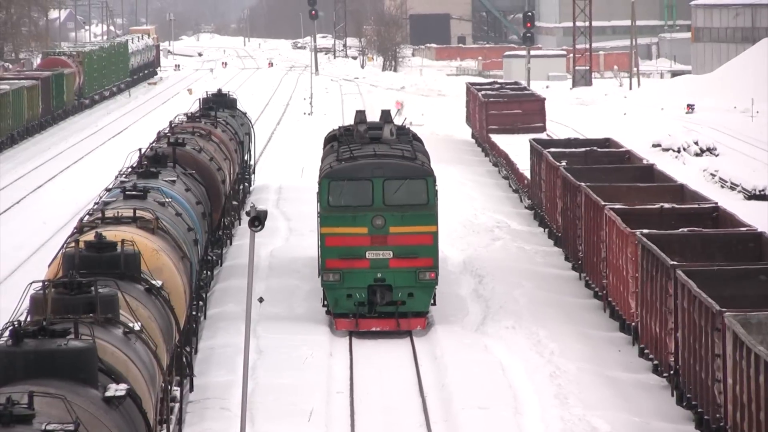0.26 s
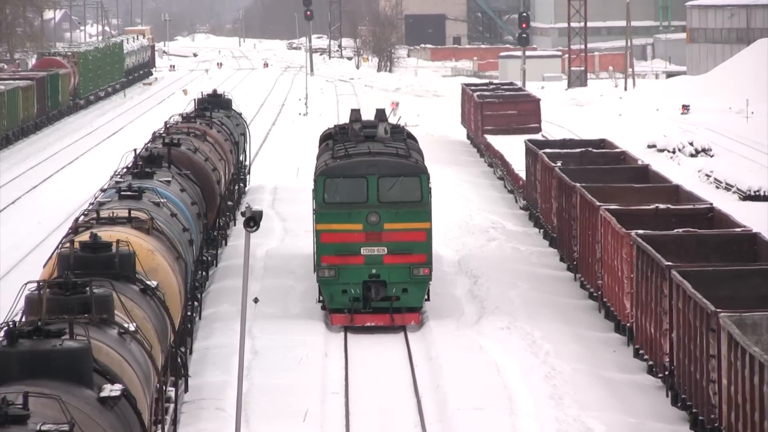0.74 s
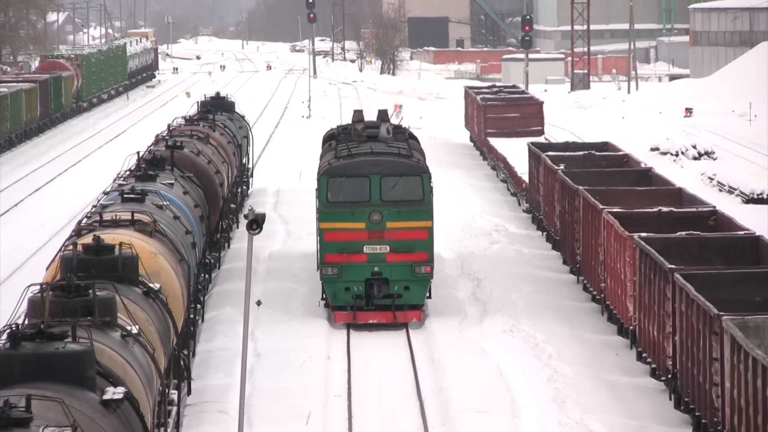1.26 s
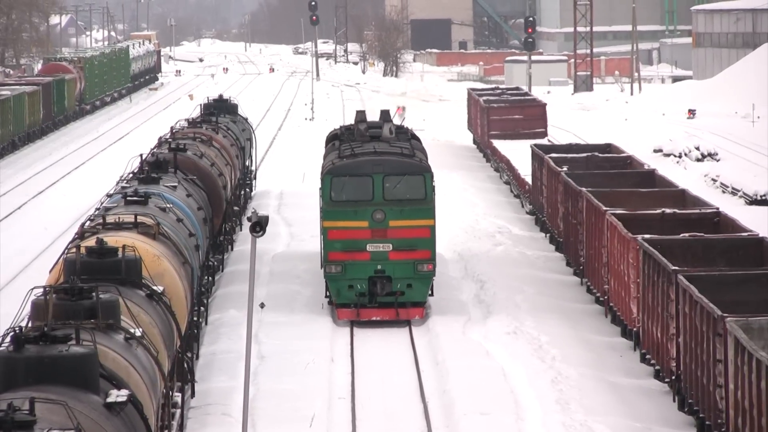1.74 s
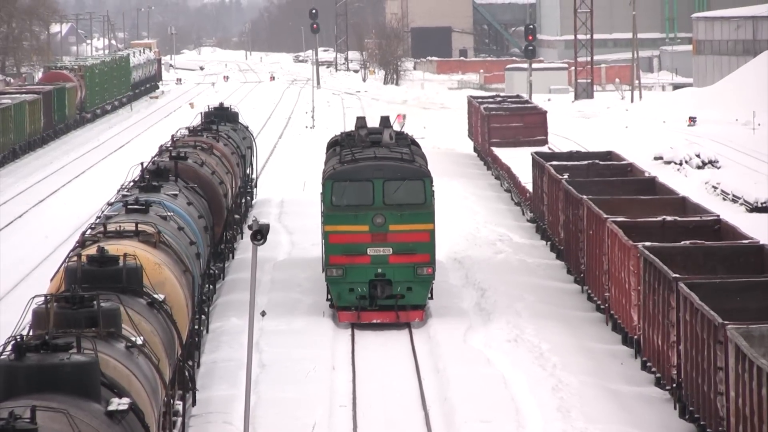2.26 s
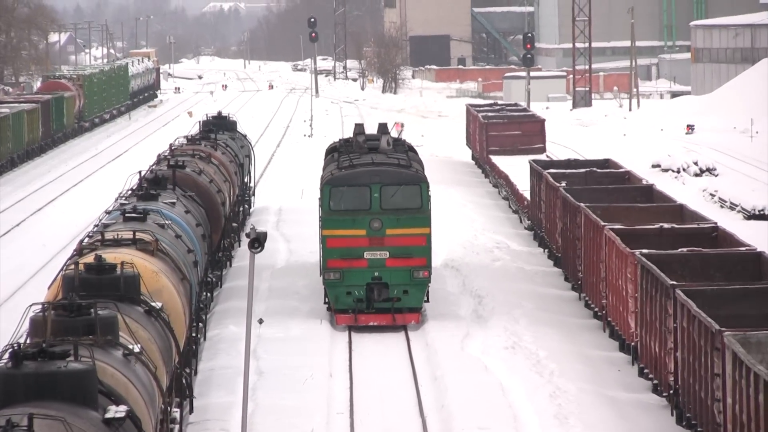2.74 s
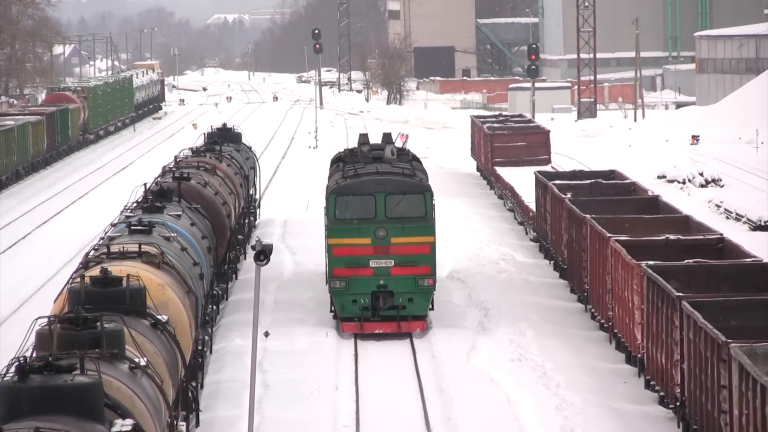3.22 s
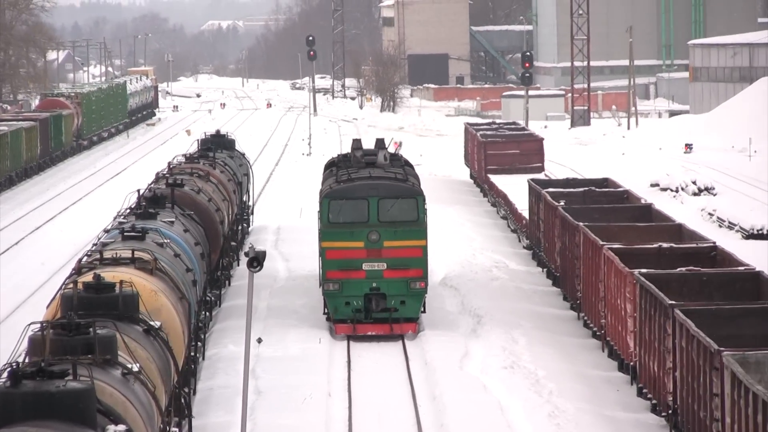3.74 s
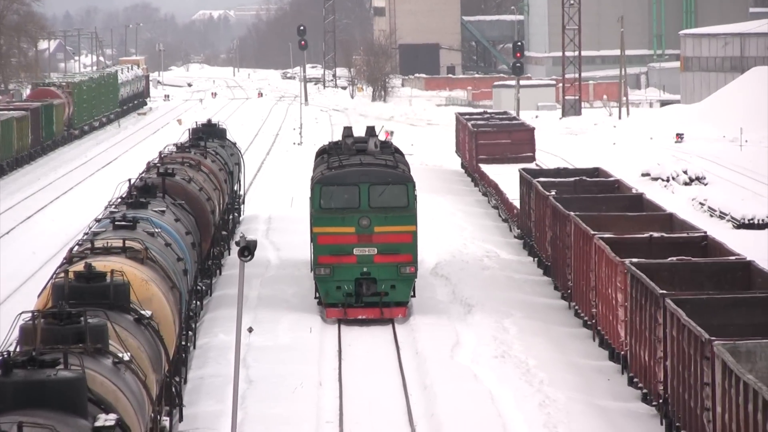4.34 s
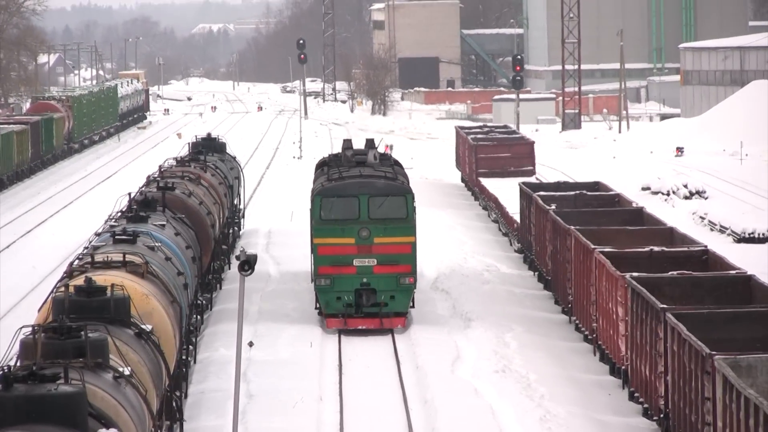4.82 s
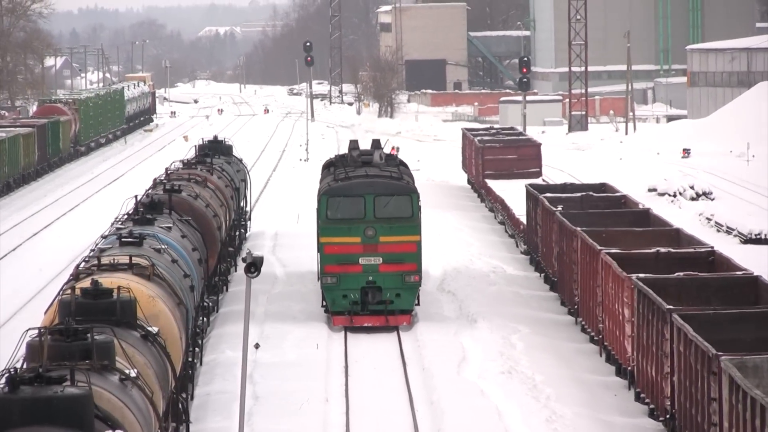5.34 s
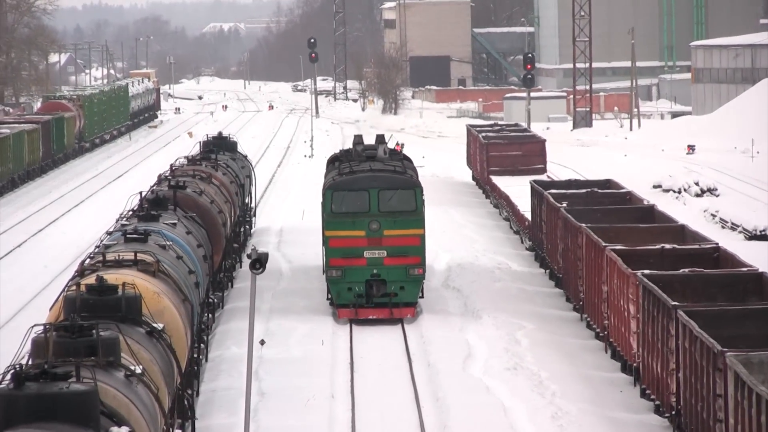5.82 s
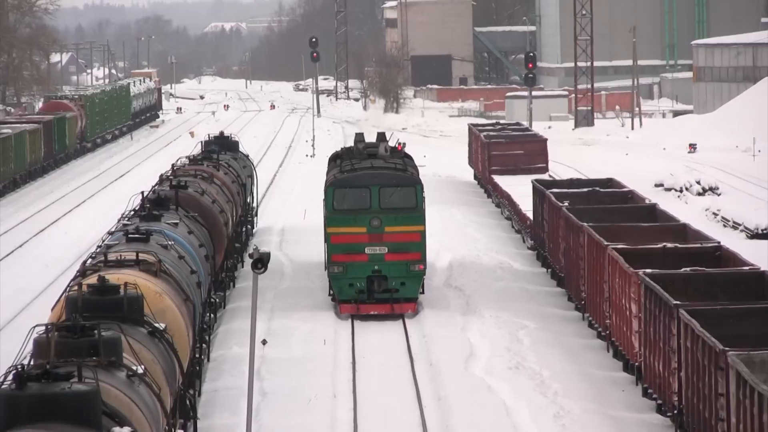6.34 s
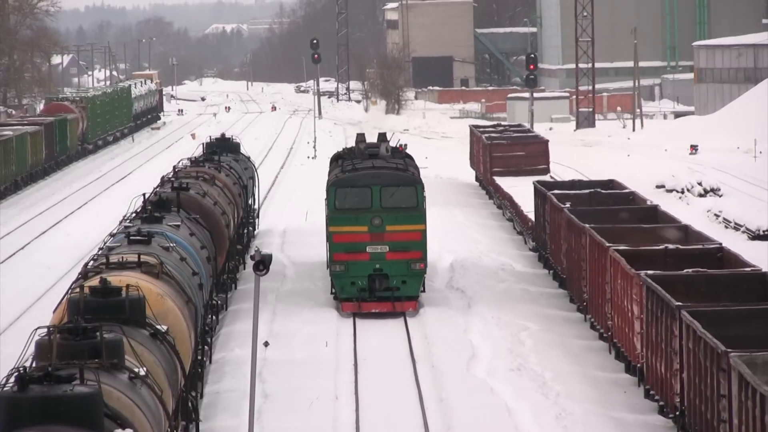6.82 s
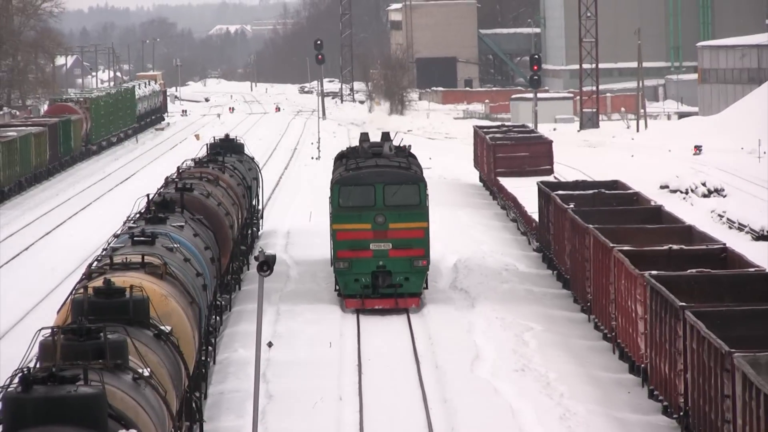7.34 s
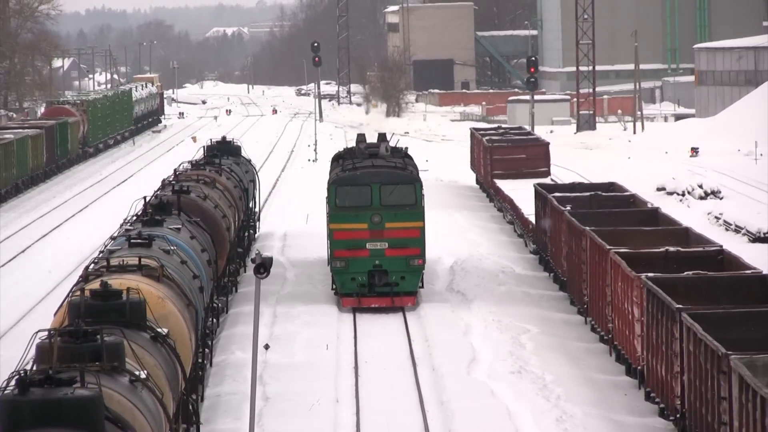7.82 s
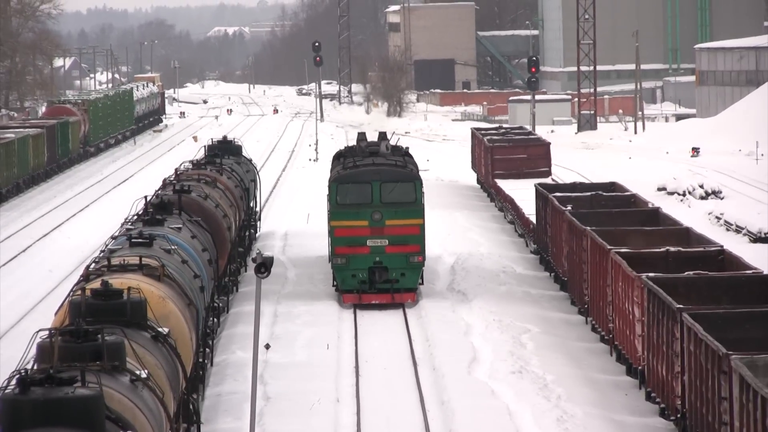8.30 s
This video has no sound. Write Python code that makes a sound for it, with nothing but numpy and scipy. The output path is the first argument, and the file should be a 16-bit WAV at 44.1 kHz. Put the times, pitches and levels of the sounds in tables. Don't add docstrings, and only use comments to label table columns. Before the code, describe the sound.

A slow, heavy diesel throb dominates, low and lumpy, loudest at the start and receding as the locomotive rolls away. Beneath it sit a rumbling block, regular dull clacks, a weak fluttering blower whine and a broad yard roar. Faint wind pressure, high hiss and steady camera whine lie underneath. From about two seconds onward, handling ticks, knocks, small rubs and one tiny squeak sound very near the stereo microphone.

```python
import sys
import numpy as np
from scipy import signal
from scipy.fft import irfft
from scipy.io import wavfile
from scipy.ndimage import uniform_filter1d, map_coordinates

SR = 44100
rng = np.random.default_rng(int(sys.argv[2]) if len(sys.argv) > 2 else 0)


def attenuation_scalar(level_db):
    decades = np.asarray(level_db, float) / 20
    return 10 ** decades


def store_pcm(level_fs):
    pcm = np.round(np.clip(level_fs, -1, 1) * 32767).astype(np.int16)
    wavfile.write(sys.argv[1], SR, np.atleast_2d(pcm).T)


N = 377937


def evened(x):
    return x / np.sqrt(np.mean(x ** 2) + 1e-20)


def read(points, hz):
    point_hz, value = np.transpose(points)
    return np.interp(np.log(hz + 1), np.log(point_hz + 1), value)


def coloured(x, points):
    half = read(points, np.fft.rfftfreq(32768, 1 / SR)) * np.log(10) / 20
    full = np.r_[half, half[-2:0:-1]]
    response = np.exp(full - 1j * signal.hilbert(full).imag)
    taps = np.fft.ifft(response).real[:9600]
    return signal.oaconvolve(x, taps)[:N]


def drift(rate_hz):
    knots = rng.standard_normal(200)
    coarse = np.arange(0, N + 256, 256)
    wander = map_coordinates(knots, [coarse / SR * rate_hz], order=3)
    return np.interp(np.arange(N), coarse, evened(wander))


def noise(points, patchy_db):
    frames, hz = N // 512 + 5, np.fft.rfftfreq(2048, 1 / SR)
    a, b, c, d, patches = rng.standard_normal((frames, 1025, 5)).T
    patches = uniform_filter1d(patches, 14, 0)
    patches = evened(uniform_filter1d(patches, 12, 1))
    inside = (hz >= points[0][0]) & (hz <= points[-1][0])
    shape = attenuation_scalar(read(points, hz)[:, None] + patchy_db * patches) * inside[:, None]
    return hz, shape * (a + 1j * b), shape * (c + 1j * d)


def heard(z):
    return evened(signal.istft(np.array(z), nperseg=2048, noverlap=1536)[1][..., :N])


def tones(hz, db):
    bins = np.zeros(N // 2 + 1, complex)
    bins[np.round(hz * N / SR).astype(int)] = attenuation_scalar(db) * np.exp(2j * np.pi * rng.random(len(hz)))
    return irfft(bins, N) * N / np.sqrt(2)


def add(mix, s, sound):
    part = mix[:, round(s * SR):][:, :sound.shape[1]]
    part += sound[:, :part.shape[1]]


def fade_db():
    fall_db, time_s = -6.5, 3.2
    return fall_db * (1 - np.exp(-np.arange(N) / SR / time_s))


def crank():
    # (time [s], speed [rpm])
    speed = [(0.0, 292.61), (0.4, 299.38), (0.8, 306.09), (1.2, 311.17), (1.6, 313.77), (2.1, 313.11),
             (2.7, 310.46), (3.4, 307.53), (4.2, 304.11), (5.0, 301.94), (6.0, 300.34), (7.0, 298.91),
             (8.0, 297.9), (8.6, 297.24)]
    s, rpm = np.transpose(speed)
    rpm_now = np.interp(np.arange(N) / SR, s, rpm)
    start_cycle = .06155
    return start_cycle + np.cumsum(rpm_now / 120) / SR


def rumble():
    # (frequency [Hz], level [dB per Hz])
    wind = [(12, -7), (25, -4.5), (40, 10.5), (60, 8.5), (90, -15)]
    hz, a, b = noise(wind, patchy_db=6.0)
    return heard([a + .2 * b, .85 * a - .2 * b]) * attenuation_scalar(-51.5 + 1.2 * drift(4.1))


def roar():
    # (frequency [Hz], level [dB per Hz])
    machinery = [(150, -36.5), (230, -5.5), (340, -10.5), (420, -6.5), (560, -12.5), (710, -11.5),
                 (950, -16), (1150, -18), (1480, -15.5), (1650, -23.5), (1800, -24.5), (2600, -33.5),
                 (3400, -43.5), (5200, -61.5)]
    # (frequency [Hz], likeness [-1 to 1])
    likeness = [(60, 0.99), (120, 0.74), (230, 0.91), (460, 0.95), (900, 0.89), (1780, 0.82), (3510, 0.52),
                (6930, -0.44), (13600, -0.62)]
    # (frequency [Hz], left over right [dB])
    balance = [(60, -2.5), (180, 4.5), (530, 0.5), (1560, 1.0), (4610, -1.5), (13600, 2.5)]
    hz, a, b = noise(machinery, patchy_db=1.7)
    same = np.clip(read(likeness, hz), -1, 1)[:, None]
    lean = attenuation_scalar(read(balance, hz) / 2)[:, None]
    left = a * lean
    right = (same * a + np.sqrt(1 - same ** 2) * b) / lean
    return heard([left, right]) * attenuation_scalar(-35.5 - 0.12 * fade_db())


def camera_hiss():
    # (frequency [Hz], level [dB per Hz])
    common = [(2000, 1), (3000, -6), (4000, -13.5), (5000, -12), (6200, -5), (7500, -5), (9300, -3.5),
              (10000, -8.5), (11500, -11.5), (12300, -21.5), (13450, -18), (13700, -40.5)]
    # (frequency [Hz], level [dB per Hz])
    opposed = [(2000, -18), (3000, -6), (5000, -4), (8000, -13.5), (8900, -5), (9300, -1), (9600, -17),
               (11000, -18.5), (12000, -19), (12400, -25.5), (13450, -22.5), (13700, -37.5)]
    mid = heard(noise(common, patchy_db=-1.5)[1]) * attenuation_scalar(-68)
    side = heard(noise(opposed, patchy_db=2.5)[2]) * attenuation_scalar(-61)
    return np.array([mid + side, mid - side])


def camera_motor():
    # (frequency [Hz], level [dB rms])
    cluster = [(4026, -71), (4049.8, -68), (4073, -71), (4091, -73), (4200, -74.5), (4474, -77),
               (4499.6, -73)]
    # (frequency [Hz], level [dB rms])
    whine = [(5173, -85), (5259, -82), (5819, -83), (5846, -87), (6164, -80), (6202, -79), (5400, -79),
             (7200, -80), (6401, -80), (8001, -80), (8452, -79), (8646, -86)]
    # (frequency [Hz], level [dB])
    shell = [(4500, -79.5), (8200, -117), (9300, -74), (9800, -82), (11500, -89.5), (12300, -86)]
    # (frequency [Hz], level [dB])
    shell_mid = [(3600, -81.5), (6200, -88.5), (7500, -93), (9400, -84.5), (10500, -86), (12000, -95.5),
                 (12500, -102), (13500, -92)]
    drum_hz, drum_db = 300, -82.5
    drum = [(k * drum_hz, drum_db) for k in (16, 17, 19, 20, 21, 22, 23, 25, 26, 27, 28)]

    t = np.arange(N) / SR
    out = np.zeros((2, N))
    for hz, db in [*cluster, *whine, *drum]:
        phase = rng.random()
        lag = np.clip(hz - 4100, 0, None) / 1900
        level = attenuation_scalar(db + 3 + 1.8 * drift(2.2))
        out += level * np.sin(2 * np.pi * (hz * t + phase) + np.array([[0], [lag]]))

    stray_count = 110
    comb = np.r_[np.arange(4500, 12100, 300), 9127, 9296, 9352, 9449, 9577, 9659]
    hz = np.r_[comb, rng.uniform(8300, 12300, stray_count)]
    lift_db = np.r_[np.full(len(comb), 5.0), 3.0 * rng.standard_normal(stray_count)]
    side = tones(hz, read(shell, hz) + lift_db)
    hz = np.r_[np.arange(3600, 13500, 150), rng.uniform(3600, 13500, stray_count)]
    mid = tones(hz, read(shell_mid, hz) + 2.8 * rng.standard_normal(len(hz)))
    return out + mid + side * np.array([[.85], [-1.1]])


def ticks():
    # (time [s], peak [dB], part above 9 kHz [dB], left over right [dB])
    sharp_ticks = [(2.8325, -30.5, -55, -0.5), (3.3565, -34, -50, -1.5), (3.6, -44, -69.5, -2.5),
                   (3.916, -50.5, -55, -2.5), (4.114, -38, -55, 3.5), (4.448, -54, -50.5, -0.5),
                   (4.678, -44, -65.5, -4), (5.114, -42.5, -69, -7.5), (5.4146, -62, -54.5, -1),
                   (5.6753, -43, -70, -7), (6.3947, -43, -59, 4), (6.4385, -46, -64, 0),
                   (7.5322, -46.5, -58, 1), (8.337, -33.5, -57.5, -3.5), (8.569, -31.5, -41.5, 3)]
    out, t = np.zeros((2, N)), np.arange(9000) / SR
    body = signal.butter(2, [3000, 9000], "band", fs=SR)
    top = signal.butter(2, [8500, 13500], "band", fs=SR)
    for s, db, top_db, pan_db in sharp_ticks:
        burst = rng.standard_normal(9000) + 0.96 * rng.standard_normal((2, 9000))
        burst *= attenuation_scalar(-60 * t / .009) + attenuation_scalar(-25 - 60 * t / .05)
        tick = attenuation_scalar(db - 1.0) * signal.lfilter(*body, burst)
        tick += attenuation_scalar(top_db + 7.0) * signal.lfilter(*top, burst)
        add(out, s, tick * attenuation_scalar(np.array([[pan_db], [-pan_db]]) / 2))
    return out


def knocks():
    # (time [s], peak [dB], centre [Hz], reach [octaves])
    blows = [(1.776, -43, 3100, .1), (1.791, -30.5, 1850, 0.43), (1.848, -40, 2930, .1),
             (1.92, -46, 3600, .08), (2.835, -24.5, 1030, .15), (2.833, -33.5, 2150, 1),
             (3.357, -36, 3750, .08), (6.412, -44, 4440, .08), (7.408, -27, 1880, 0.25),
             (7.41, -39, 3350, 0.11), (7.857, -41, 2500, .5), (7.886, -36, 2250, .06),
             (7.995, -39, 2400, .3), (8.337, -32.5, 3750, .1)]
    # (frequency [Hz], time to fall 60 dB [s])
    case = [(1030, 0.063), (1410, 0.06), (1645, 0.08), (1930, 0.033), (2270, 0.041), (2830, 0.035),
            (3100, 0.032), (3500, 0.018), (3700, 0.016), (4100, .03), (4440, 0.038)]
    out, t = np.zeros((2, N)), np.arange(9000) / SR
    mode_hz, t60 = np.transpose(case)[:, :, None]
    for s, db, hz, reach in blows:
        spread = mode_hz * rng.uniform(.96, 1.04, (3, len(case), 1))
        near_db = -6 * (np.log2(mode_hz / hz) / reach) ** 2
        modes = np.sin(2 * np.pi * spread * t).mean(0) * attenuation_scalar(db + near_db - 60 * t / t60)
        ring = modes.sum(0) * np.minimum(t / 0.0012, 1)
        add(out, s, np.array([ring, .95 * ring]))
    return out


def scrapes():
    # (start [s], end [s], low edge [Hz], high edge [Hz], level [dB])
    rubs = [
        (1.774, 1.95, 1500, 3500, -56),
        (3.356, 3.451, 5000, 9800, -63.5),
        (4.66, 4.811, 2000, 6000, -67),
        (7.413, 7.453, 1500, 3500, -55),
        (7.841, 8.035, 1900, 3300, -56.5),
    ]
    out = np.zeros((2, N))
    for start, end, low_hz, high_hz, db in rubs:
        grip = evened(uniform_filter1d(rng.standard_normal(9000), 300))
        grains = rng.standard_normal((2, 9000)) * attenuation_scalar(3.5 * grip)
        band = signal.butter(3, [low_hz, high_hz], "band", fs=SR)
        rub = evened(signal.lfilter(*band, grains + grains[::-1] * .6))
        rub = rub[:, :round((end - start) * SR)]
        add(out, start, attenuation_scalar(db) * rub * signal.windows.tukey(rub.shape[1], .3))
    return out


def squeak():
    start_s, length_s, hz, db = 7.035, .07, 2820, -54
    out, t = np.zeros((2, N)), np.arange(9000) / SR
    swell = np.sin(np.pi * np.minimum(t / length_s, 1))
    add(out, start_s, attenuation_scalar(db) * swell * np.sin(2 * np.pi * hz * t) * np.ones((2, 1)))
    return out


def blower():
    # (frequency [Hz], level [dB rms])
    whine = [(1482, -58.5), (1497, -56), (1635, -61.5)]
    t, out = np.arange(N) / SR, np.zeros(N)
    for hz, db in whine:
        flutter = attenuation_scalar(2.5 * drift(11))
        wobble = np.cumsum(drift(6)) / SR * 1.3
        out += attenuation_scalar(db + 5) * flutter * np.sin(2 * np.pi * (hz * t + wobble))
    return out


def block():
    # (frequency [Hz], level [dB per Hz])
    iron = [(40, -81), (60, -8.5), (85, 2), (120, -4), (155, 6), (200, 0.5), (270, -2.5), (330, -13.5),
            (450, -12.5), (560, -18.5), (700, -20.5), (900, -41)]
    change = .3
    fresh = rng.standard_normal((24, 4096))
    kept = np.sqrt(1 - change ** 2)
    pattern = signal.lfilter([1], [1, -kept], np.r_[fresh[:1], change * fresh[1:]], axis=0)
    cycles = crank()
    shaking = np.interp(cycles * 4096, np.arange(pattern.size), pattern.ravel())
    swing_db = 2.5 * np.cos(2 * np.pi * (cycles - .18))
    return evened(coloured(shaking, iron)) * attenuation_scalar(-26 + 0.65 * fade_db() + swing_db)


def valve_gear():
    angle_deg, hz, t60_s, db = 146, 705, .09, -30
    at = np.flatnonzero(np.diff(np.floor(2 * crank() - angle_deg / 360)))
    train, t = np.zeros(N), np.arange(6000) / SR
    train[at] = attenuation_scalar(2.5 * rng.standard_normal(60)[:len(at)])
    ring = np.sin(2 * np.pi * hz * t) * attenuation_scalar(-60 * t / t60_s) * np.minimum(t / .008, 1)
    return signal.oaconvolve(train, ring)[:N] * attenuation_scalar(db + 0.28 * fade_db())


def exhaust():
    # (crank angle [deg], first turn near [dB], first turn far [dB],
    #         second turn near [dB], second turn far [dB])
    firings = [(10.4, -2.0, -4.0, -3.0, -3.0), (44.4, -30.0, -10.0, -18.0, -23.0),
               (84.0, -13.0, -9.0, -11.0, -8.0), (102.5, -5.0, -30.0, -7.0, -6.0),
               (117.5, -4.0, 0.0, -5.0, -8.0), (147.5, -5.0, -3.0, -5.0, -10.0),
               (170.0, -5.0, -2.0, -4.0, -3.0), (207.5, -6.0, -3.0, -2.0, -14.0),
               (238.5, -26.0, -8.0, -13.0, -30.0), (267.5, -13.0, -7.0, -20.0, -6.0),
               (308.0, -15.0, -10.0, -5.0, -5.0), (314.5, -14.0, -17.0, -0.0, 0.0),
               (336.5, -13.0, -19.0, -8.0, -6.0), (346.5, -8.0, -13.0, -10.0, -13.0)]
    # (frequency [Hz], level [dB])
    stack = [(20.0, -36.0), (50.0, -66.2), (80.0, -12.6), (105.0, -14.8), (125.0, -5.3), (155.0, -0.4),
             (180.0, -10.2), (200.0, -19.3), (290.0, -46.7), (400.0, -57.4), (1000.0, -36.0)]
    recede_s, uneven_db = 3, 0.27
    cycles, train = crank(), np.zeros(N)
    for angle, *strength_db in firings:
        for turn, (near, far) in enumerate(attenuation_scalar(np.reshape(strength_db, (2, 2)))):
            at = np.flatnonzero(np.diff(np.floor(cycles - angle / 720 - turn / 2)))
            strength = far + (near - far) * np.exp(-at / SR / recede_s)
            train[at] -= strength * attenuation_scalar(uneven_db * rng.standard_normal(30)[:len(at)])
    silencer = signal.butter(4, [45, 330], "band", fs=SR, output="sos")
    boom = signal.sosfiltfilt(silencer, coloured(train, stack))
    slow = np.sqrt(uniform_filter1d(boom ** 2, SR))
    return boom / slow * attenuation_scalar(-15.5 + fade_db())


def scene():
    engine = exhaust() + block() + valve_gear() + blower()
    engine = engine * attenuation_scalar(np.array([[.9], [-1.0]]))
    handling = ticks() + knocks() + scrapes() + squeak()
    return engine + roar() + rumble() + camera_hiss() + camera_motor() + handling


def band_limit(x):
    return signal.sosfilt(signal.butter(12, 13660, fs=SR, output="sos"), x)


def record(dry):
    return band_limit(dry + 0.0093)


dry = scene()
out = record(dry)
store_pcm(out)
```